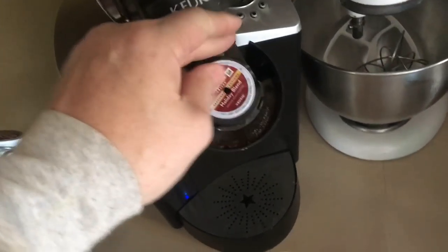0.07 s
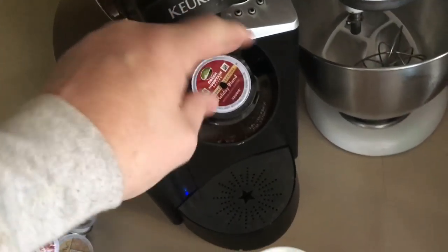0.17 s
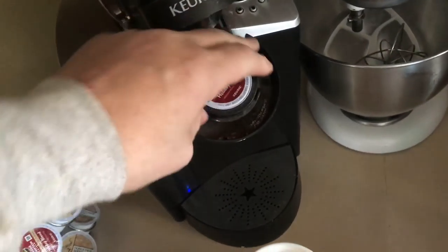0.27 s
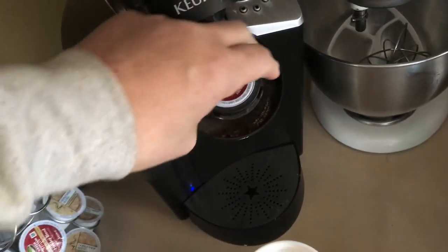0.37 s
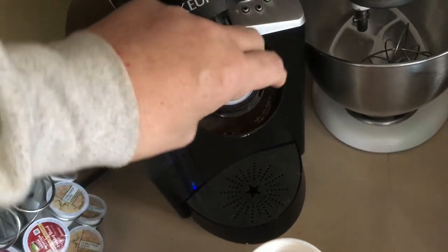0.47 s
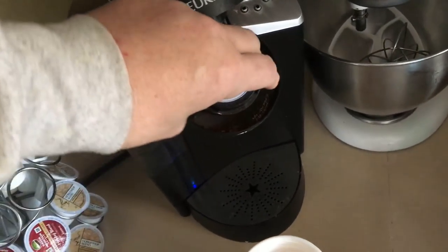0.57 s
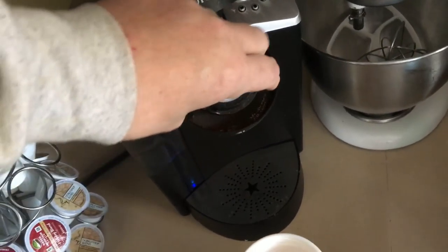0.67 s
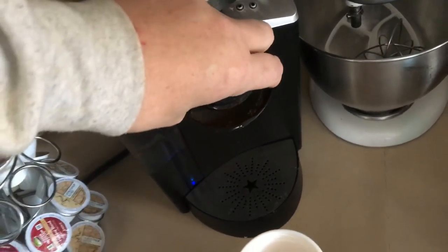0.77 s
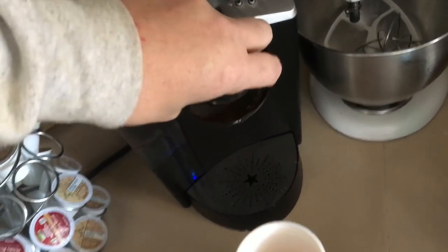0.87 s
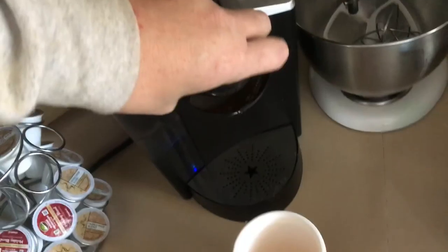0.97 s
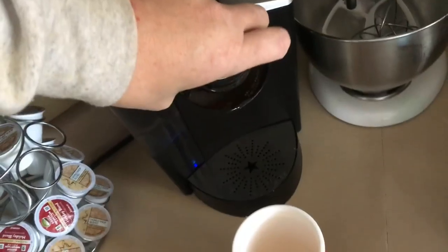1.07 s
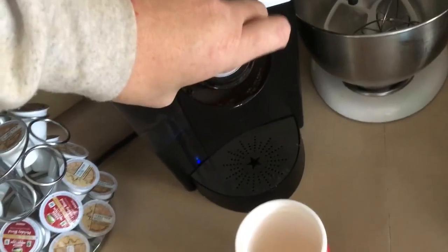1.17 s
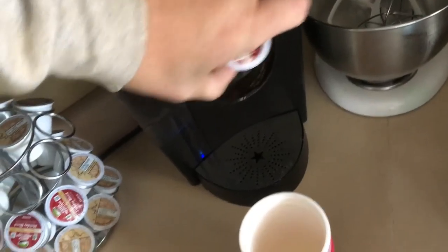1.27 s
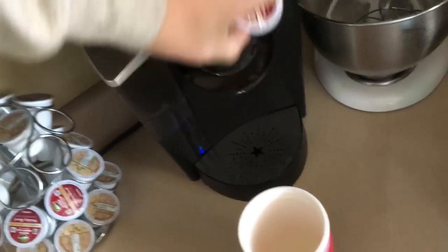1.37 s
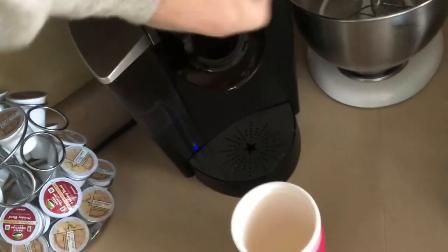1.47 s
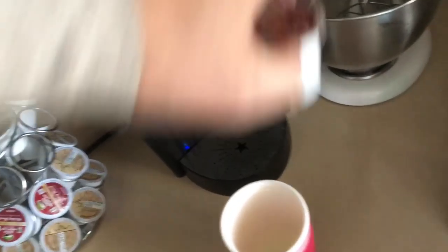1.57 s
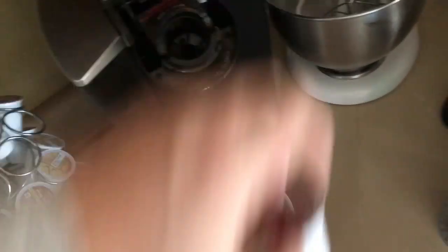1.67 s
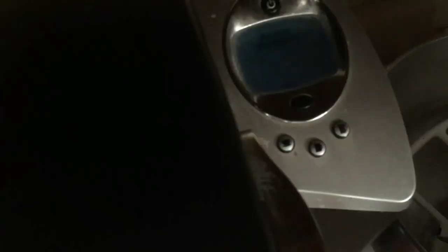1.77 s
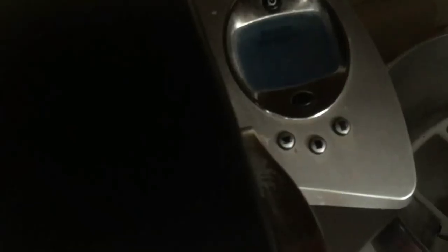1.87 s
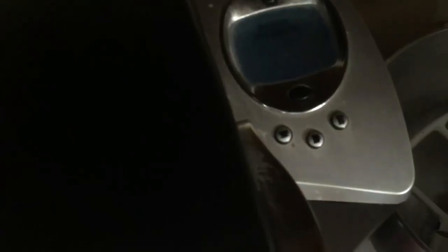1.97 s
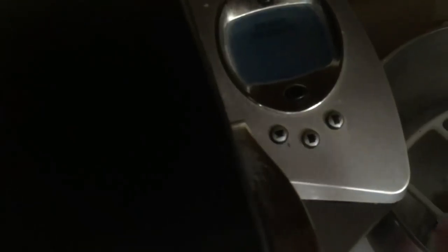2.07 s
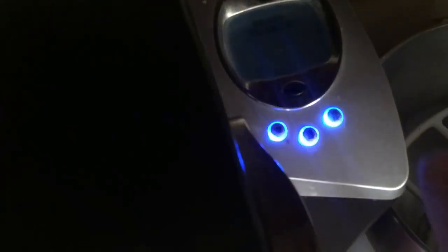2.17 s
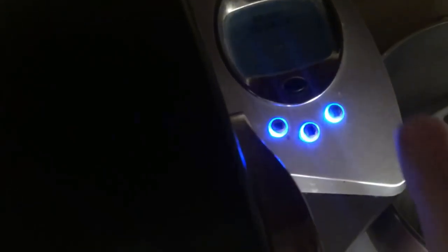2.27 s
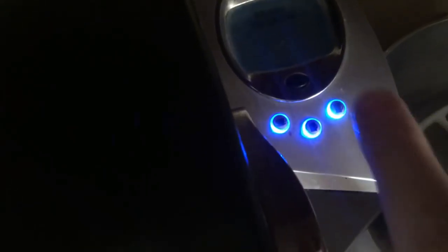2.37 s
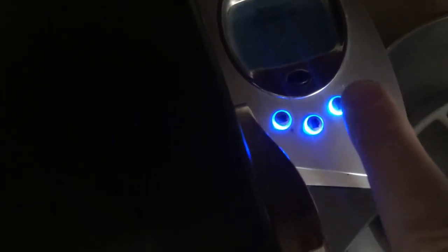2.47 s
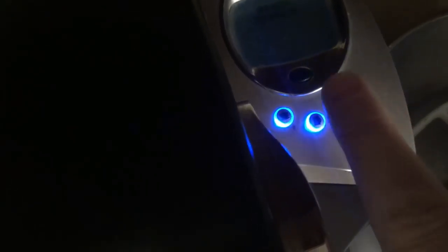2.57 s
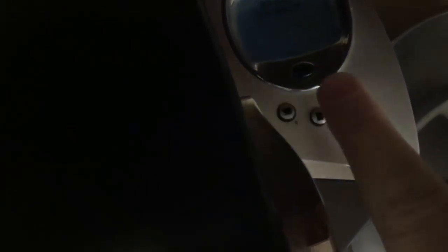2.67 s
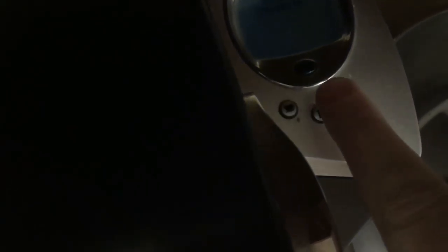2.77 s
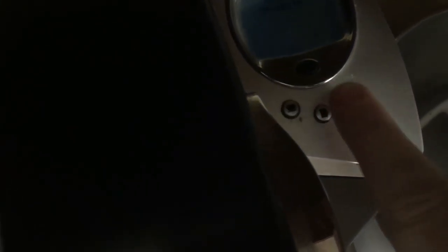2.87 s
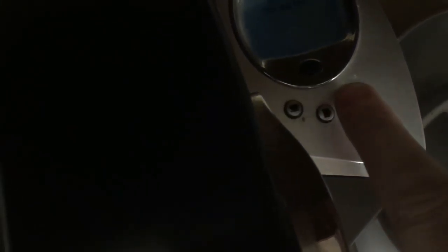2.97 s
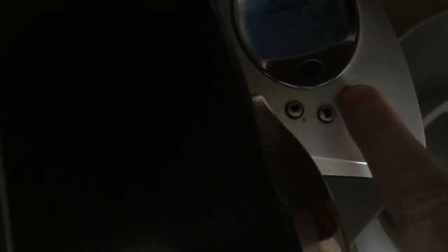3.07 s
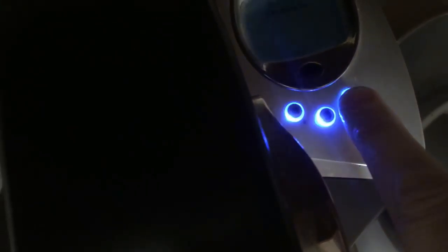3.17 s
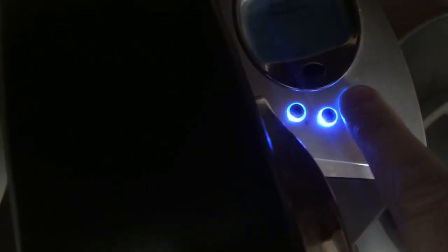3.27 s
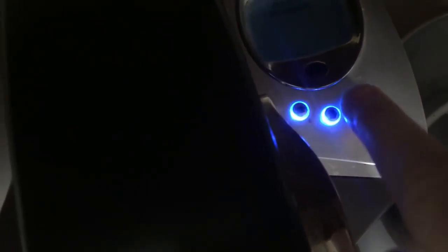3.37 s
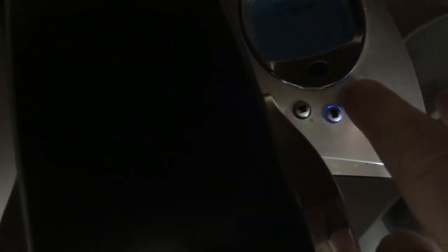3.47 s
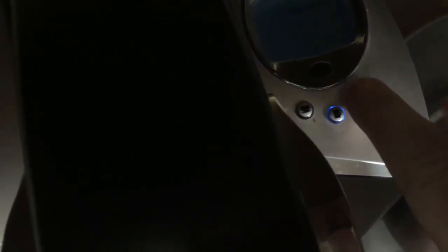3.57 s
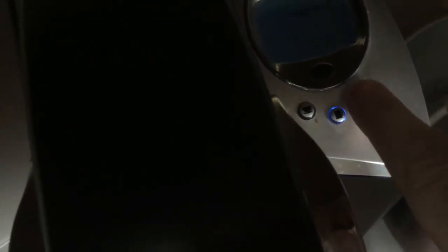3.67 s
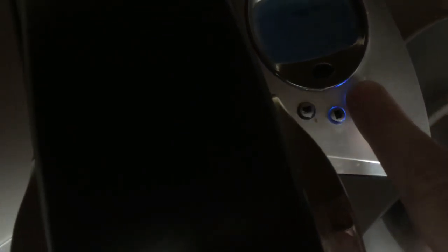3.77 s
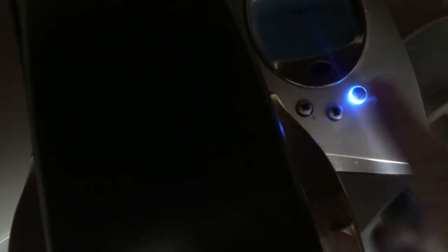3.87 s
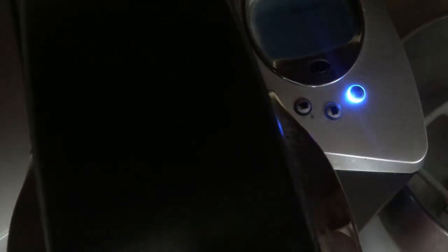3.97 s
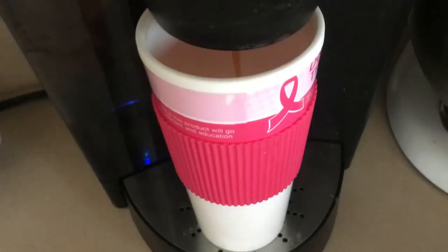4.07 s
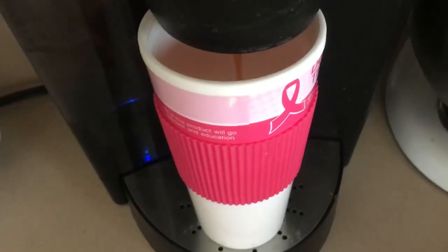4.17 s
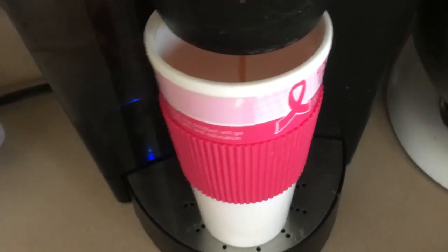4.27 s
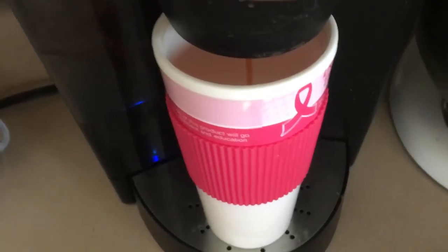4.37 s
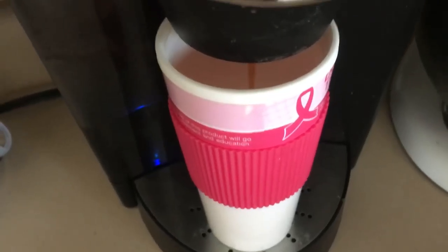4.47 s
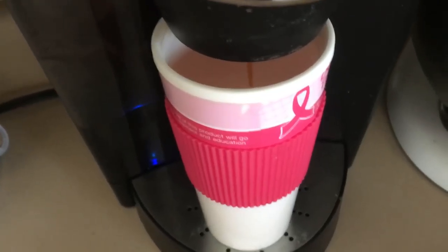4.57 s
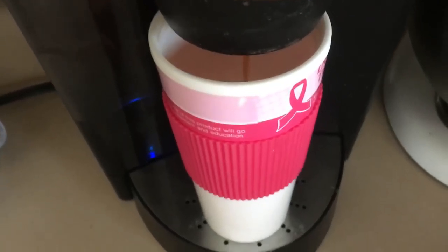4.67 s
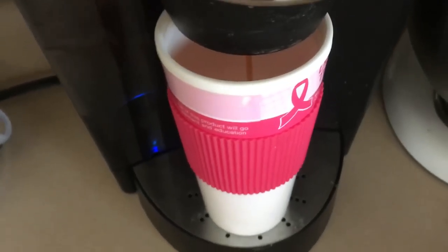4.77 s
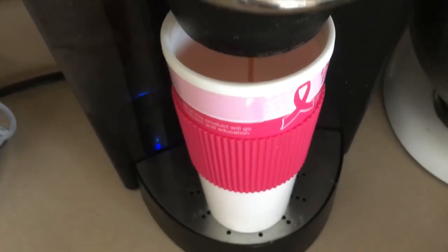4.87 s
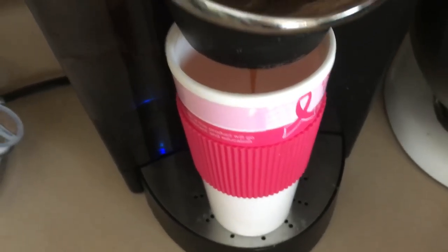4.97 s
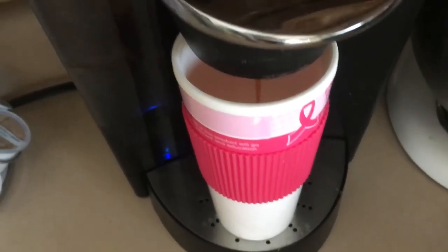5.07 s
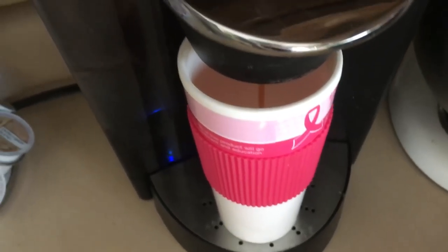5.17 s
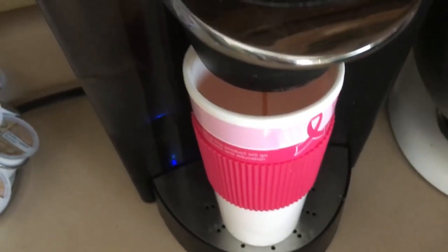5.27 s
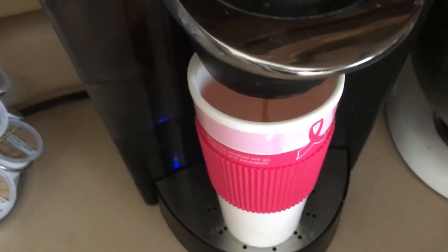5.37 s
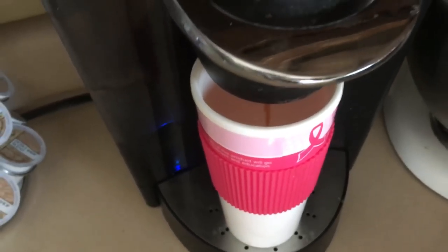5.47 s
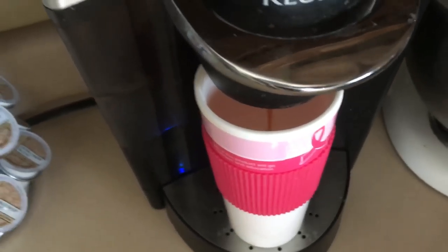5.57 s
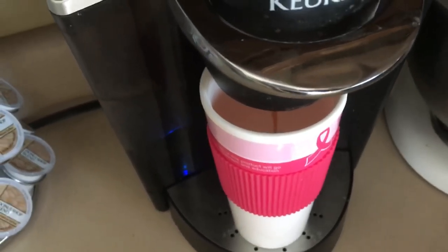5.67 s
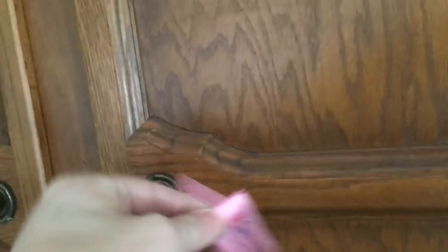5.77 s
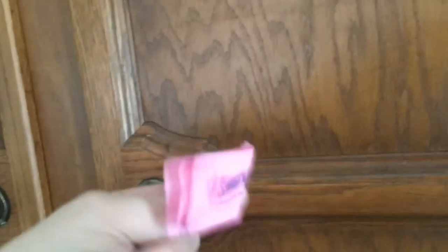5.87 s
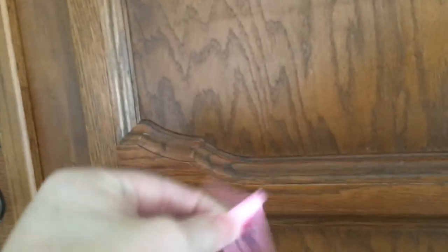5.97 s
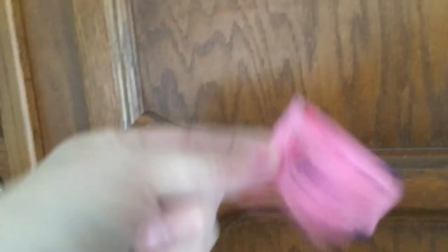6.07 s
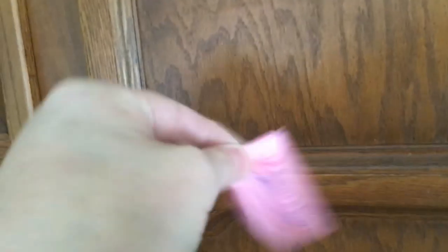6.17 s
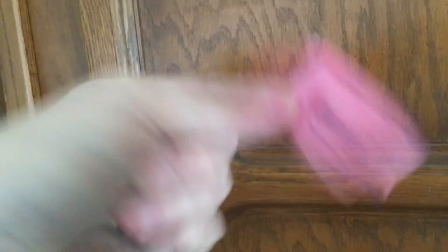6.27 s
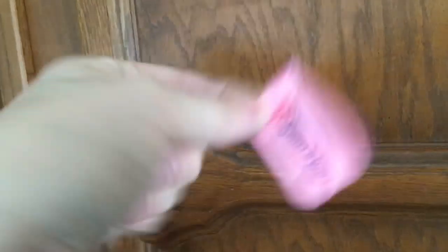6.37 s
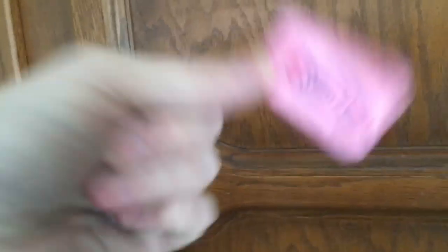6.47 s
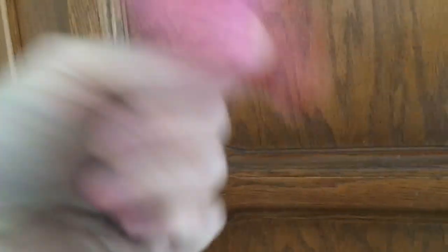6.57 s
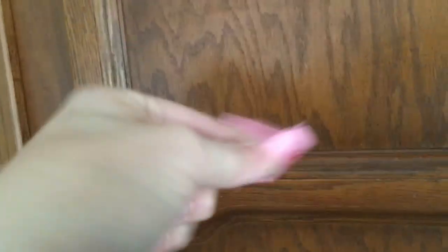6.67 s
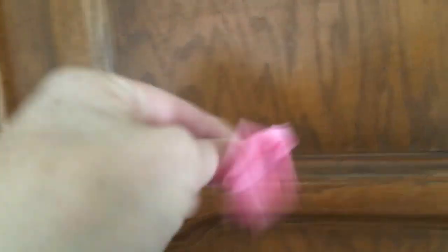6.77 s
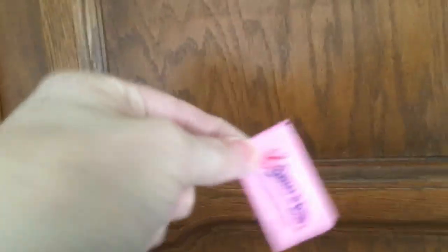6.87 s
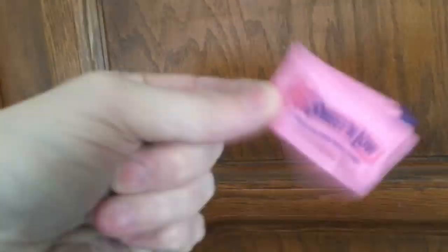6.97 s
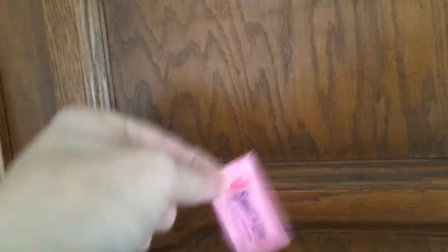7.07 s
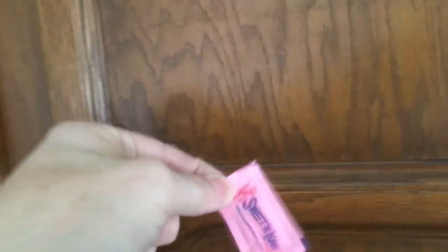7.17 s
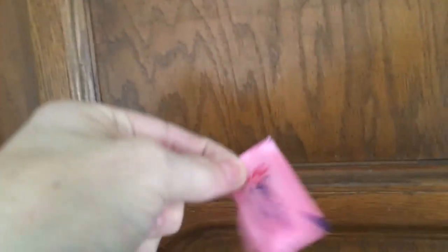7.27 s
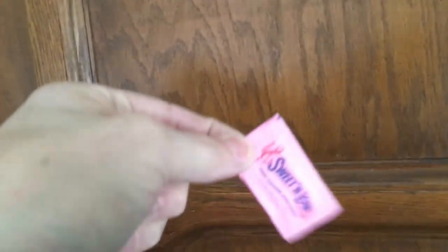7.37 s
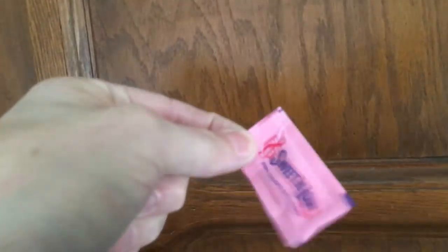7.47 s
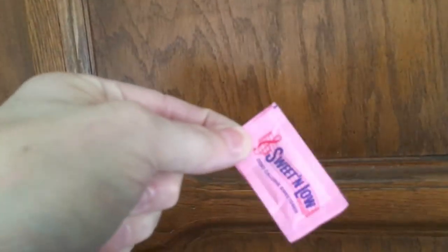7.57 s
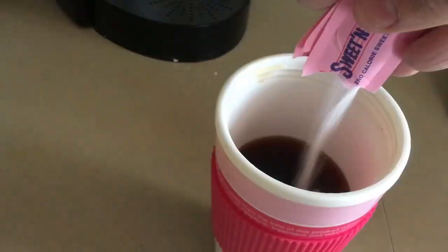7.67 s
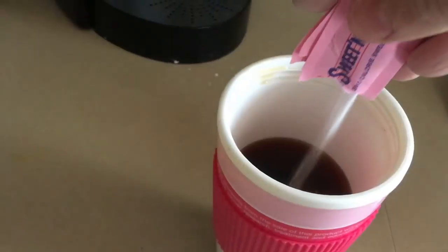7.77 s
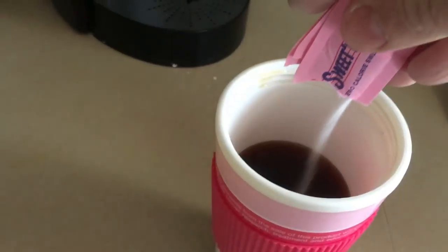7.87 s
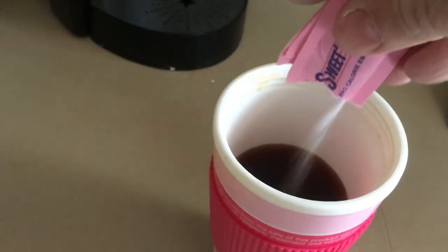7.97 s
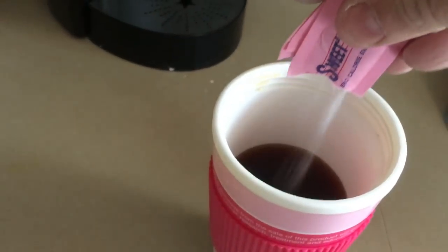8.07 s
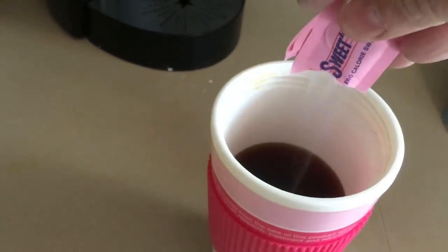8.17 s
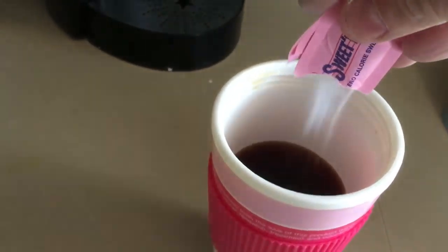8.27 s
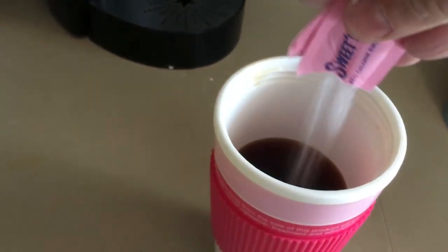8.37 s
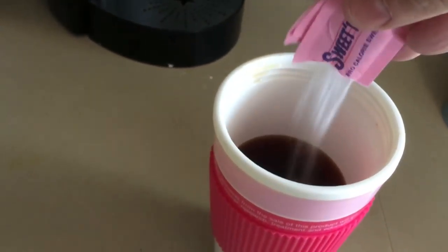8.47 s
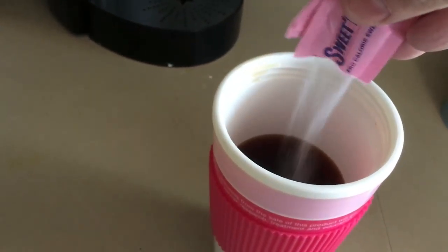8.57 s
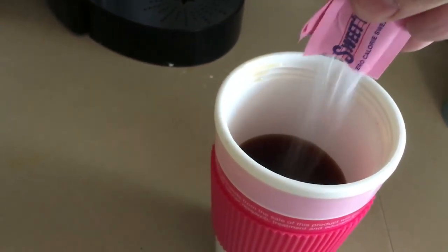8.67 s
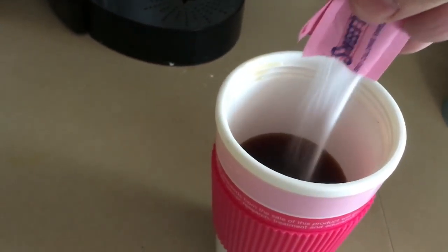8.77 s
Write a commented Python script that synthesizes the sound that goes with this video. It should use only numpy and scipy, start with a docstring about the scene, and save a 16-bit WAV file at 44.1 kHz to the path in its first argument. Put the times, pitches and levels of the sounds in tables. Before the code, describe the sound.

Hands rub and knock on plastic as a pod is pressed into a coffee brewer, and the lid snaps shut. After a quiet stretch with a metallic tap and button clicks, coffee sputters into a paper cup with a fluttering hiss. Paper sweetener sachets are then shaken in quick, crisp snaps, and a motor drones under a few faint ticks. Everything sounds close, in a small kitchen.

```python
"""Hands rub and knock on plastic as a pod is pressed into a coffee brewer, and the lid snaps shut.
Four more kitchen moments follow: a button is pressed; coffee sputters into a paper cup, its flow
fluttering and exciting the cup's resonances; paper sachets of sweetener are shaken, their snaps jolting
the powder; sparse faint ticks sound while a motor drones nearby. Impacts ring in damped modes and
reverberate in a small hard room. Twice the sound drops out for an instant."""
import sys
import numpy as np
from scipy import signal
from scipy.fft import rfft, irfft, next_fast_len
from scipy.io import wavfile

SR = 44100
rng = np.random.default_rng(int(sys.argv[2]) if len(sys.argv) > 2 else 0)


def put_to_file(sound):
    """Save the sound as 16-bit audio at rate SR, in the file named by the first command-line argument."""
    columns = np.atleast_2d(sound).T  # one column per channel
    safe = np.clip(columns, -1, 1)
    whole_steps = np.round(safe * 32767)
    wavfile.write(sys.argv[1], SR, whole_steps.astype(np.int16))


N = 389403
T = np.arange(N) / SR

# Bounds of the five moments in seconds: pod, button, brewing, shaking, motor.
MOMENTS_S = [0, 1.795, 4.077, 5.756, 7.675, 9]
# Room noise, one spectrum per moment. Each point: frequency in Hz, relative density in dB.
AIR_SPECTRA = [
    [(18, -29), (30, 8), (204, 1), (280, -6), (384, -15), (526, -17), (721, -14.5), (16000, -34)],
    [(18, -42), (30, 6.5), (70, 1.5), (165, -16.5), (632, -21), (866, -24.5), (1220, -25), (5040, -35),
     (12000, -38.5), (16000, -37)],
    [(20, -36), (40, 2), (100, -11), (200, -19), (700, -7), (1700, -9), (2700, -13.5), (7000, -21.5),
     (16000, -32)],
    [(20, -37), (40, -10), (80, -5.5), (170, -15), (450, -26.5), (1500, -21.5), (5000, -30), (11000, -28),
     (16000, -35)],
    [(20, -35), (40, -4.5), (110, -5.5), (175, -13), (330, -8.5), (650, -10), (1000, -15), (1300, -18.5),
     (2800, -24.5), (3900, -29), (4500, -31.5), (12500, -33.5), (16000, -44)],
]
# Level of the room noise in dB, one per moment.
AIR_LEVELS_DB = [-60.5, -60, -50, -53.5, -45]
# Hums, one list for each of the last three moments. Each row: frequency in Hz, width in Hz, level in dB.
HUMS = [
    [(98.7, 15, -52.5)],
    [(55.44, 12.4, -52), (222.3, 17.1, -60), (290.7, 26.8, -65.5)],
    [(55.8, 2.5, -47), (101.4, 5.74, -46.5), (226, 9.3, -51), (288.8, 20, -44.5), (345.3, 11.9, -44),
     (440, 7.2, -54), (494, 13.16, -51), (590, 8.5, -56), (709, 29.96, -48), (810, 11.2, -56.5),
     (953, 29.8, -55), (3900, 100, -68.5)],
]
# Hands grip the housing. Each row: strongest instant in seconds, rumble in dB, rustle in dB,
# then the rise and the rumble's fade in seconds per 60 dB.
RUBS = [(.06, -40.5, -47, 1.1, 0.41), (0.203, -28, -31.5, 0.21, 0.42), (.55, -60.5, -65.5, 0.14, 3),
        (.74, -52.5, -58, 0.65, 0.92), (1.06, -62, -60.5, 1.6, 4.2), (1.341, -35.5, -37, 0.11, 0.42),
        (1.738, -71.5, -67.5, 0.74, 1), (3.4, -50, -67.5, 0.14, 0.61), (3.59, -56, -70, 0.64, .35),
        (3.85, -58.5, -87.5, 0.32, 0.51),]
# Spectrum of skin sliding on plastic. Each row: frequency in Hz, relative density in dB.
RUSTLE_SPECTRUM = [(410, -38.5), (700, -6), (863, -7.5), (997, -12), (1460, -13), (5400, -24), (16000, -34)]
# Resonances of the plastic shells. Each row: frequency in Hz, width in Hz, level in dB.
SHELL_MODES = [(594, 65, -2), (846, 91, 2.5), (1737, 230, -5.5), (2120, 47, -9.5), (2740, 52, -8.5),
               (3410, 140, -13), (3940, 55, -12.5), (4440, 160, -12), (5740, 120, -16.5), (6570, 110, -19)]
# What is knocked: pod, housing, button, the lid's rim, a fingertip on the panel. Each holds: ring in Hz,
# rattle t60 in seconds, relative thud in dB, weight of broad clatter, top of the crack in Hz.
POD = (2048.5, 0.12, -26, 2.5, 10999)
HOUSING = (902, 0.12, -11, 3, 11002)
BUTTON = (1203, 0.07, -0.5, 2.5, 17000.5)
RIM = (3400, .1, -22, .8, 12000)
FINGER = (400, 0.1, 1, 0.17, 15000)
# Knocks on the brewer. Each row: start in seconds, level in dB, relative crack in dB, part struck.
KNOCKS = [(.048, -33, -9, POD), (.06, -40, -25, HOUSING), (.133, -25, -16.5, POD), (0.139, -19, 1, POD),
          (0.167, -21.5, -7.5, POD), (.194, -16, -4, POD), (.203, -10.5, -6, HOUSING),
          (.208, -19.5, -4.5, POD), (.29, -32.5, -7, POD), (.454, -21, -27, POD), (0.518, -37, -14, POD),
          (.538, -41, -9, POD), (.63, -26, -4, POD), (.68, -40.5, -20, POD), (0.73, -35.5, -9, POD),
          (.927, -40.5, -25, POD), (.94, -44, -25, POD), (0.976, -34.5, -1.5, POD),
          (1.057, -37.5, -27, HOUSING), (1.272, -55.5, 10, RIM), (1.333, -26, -0.5, RIM),
          (1.345, -32.5, -1.5, RIM), (1.408, -33.5, -9, RIM), (3.376, -27.5, 1, BUTTON),
          (3.4072, -33, -11, BUTTON), (3.439, -49, -25, FINGER), (3.545, -44, -12, FINGER),
          (3.591, -45.5, -8.5, FINGER), (3.827, -58, -26.5, FINGER), (3.916, -46, -14, BUTTON),
          (3.928, -39.5, -16, POD)]
# Gaps in the sound. Each row: start, onset of silence and end in seconds, gain in dB before the silence.
DROPOUTS = [(0.476, 0.498, .516, -21), (6.916, 6.927, 6.956, -23)]
# Taps on a small metal part. Each row: start in seconds, level in dB.
METAL_TAPS = [(.975, -34), (2.643, -20)]
# Modes of the metal part and of the lid. Each row: frequency in Hz, level in dB, t60 in seconds.
METAL_MODES = [(380, -15, .06), (620, -10, .06), (1254, -9, .05), (1626, -9, .08), (2083, -7, .045),
               (3187, -2, .04), (3750, -6, .035), (4620, -4, .055), (4753, -8, .09), (5879, -7, .045),
               (6831, -11, .075), (8231, -10, .085), (9905, -12, .04), (10810, -9, .07), (14090, -5, .065),
               (15150, -9, .04)]
LID_MODES = [(880, -14, .05), (1000, -4, .09), (1061, -1, .08), (1180, -2, .07), (1287, 0, .075),
             (1400, -4, .06), (2050, -6, .03), (2450, -6, .03), (2830, -2, .035), (4200, -15, .05),
             (6175, -18, .035)]
# Air and coffee in the outlet. Each row: time in seconds, resting pitch in Hz, flutter in dB, rush in dB.
FLOW = [(4.077, 395, -46, -35.5), (4.159, 389, -46, -39), (4.3, 386.8, -46.5, -37.5),
        (4.44, 382, -46.5, -35), (4.481, 365.8, -44, -37.5), (4.631, 356.4, -46, -36),
        (4.8, 389.4, -48.5, -36), (5.0, 391.3, -47.5, -38.5), (5.101, 361.4, -46, -40.5),
        (5.2, 354.2, -44.5, -36), (5.4, 357.3, -47, -34), (5.65, 357.8, -50.5, -36),
        (5.756, 368.6, -49.5, -38)]
# The flutter hops up and falls back. Each row: centre in seconds, rise in Hz, half length in seconds.
HOPS = [(4.086, 79.5, .015), (4.133, 65.3, .018), (4.185, 70.3, .012), (4.269, 75.7, .015),
        (4.676, 104.4, .022), (4.769, 89.2, .022), (4.847, 80.4, .012), (4.911, 80.6, .018),
        (5.122, 61.2, .01), (5.175, 95.6, .022), (5.335, 134.9, .035), (5.468, 104.5, .025),
        (5.541, 89.8, .015), (5.603, 61.2, .02), (5.724, 148, .04)]
# The flow stalls. Each row: centre in seconds, dip of the flutter in dB.
STALLS = [(5.2, -8), (5.236, -15), (5.289, -26), (5.43, -16), (5.569, -26), (5.7, -5)]
# The flutter turns uneven as the flow weakens. Each row: time in seconds, level spread in dB.
RASP = [(5.1, 2), (5.3, 3.8)]
# Harmonics of the flutter, each heard where it meets a resonance.
# Each row: harmonic number, resonance in Hz, half width in Hz, relative level in dB.
OVERTONES = [(2, 719, 64, 4.5), (3, 1170, 110, 11), (5, 1860, 94, -12), (7, 2950, 83, -9.5)]
# Resonances of cup and outlet. Each row: frequency in Hz, width in Hz, level in dB.
CUP_MODES = [(1045, 24, -4), (1157, 18, -3), (1240, 35, -9), (1345, 30, -14), (1460, 35, -16),
             (880, 45, -19), (2080, 60, -18), (2280, 30, -21), (2590, 65, -13), (3370, 40, -25),
             (3740, 90, -21), (4680, 200, -23), (5750, 350, -24), (4130, 60, -26), (2830, 90, -20),
             (480, 90, -15), (715, 60, -12)]
# Bursting drops; snaps of shaken paper; the sachet's last sharp snaps, then sparse faint ticks.
# Each row: time in seconds, peak in dB, resonance in Hz.
SPLASHES = [(4.1043, -35.5, 4820), (4.152, -29, 4730), (4.19, -38, 6800), (4.3028, -28, 4470),
            (4.3202, -28.5, 8750), (4.408, -33, 6160), (4.4869, -33, 5880), (4.5327, -25.5, 5400),
            (4.572, -41, 13010), (4.5992, -28, 4970), (4.705, -35, 12940), (4.7391, -32, 3948),
            (4.8528, -24, 5336), (4.868, -31, 5000), (4.891, -28.5, 5560), (4.9549, -29.5, 13340),
            (4.986, -20.5, 5080), (5.0506, -27, 4130), (5.084, -38, 13700), (5.1486, -27.5, 8120),
            (5.2063, -30.5, 5640), (5.2919, -35.5, 8600), (5.3207, -43, 8840), (5.3709, -28.5, 4700),
            (5.3928, -27, 5800), (5.4646, -31.5, 3960), (5.5627, -23, 4020), (5.6112, -32, 5740),
            (5.6408, -29, 8370), (5.6903, -19.5, 5450), (5.7373, -28.5, 3714)]
PAPER_SNAPS = [(5.791, -31, 3960), (5.805, -19.5, 4500), (5.815, -17, 6230), (5.844, -22, 11100),
               (5.853, -8, 5300), (5.864, -20, 3980), (5.9157, -11, 6170), (5.927, -18, 8000),
               (6.057, -19, 7000), (6.107, -18, 6000), (6.063, -9, 7200), (6.0968, -5, 4000),
               (6.1598, -14, 4100), (6.166, -7.5, 6800), (6.1813, -7.5, 6700), (6.1944, -16, 8000),
               (6.215, -6.5, 6300), (6.2376, -15, 6000), (6.258, -14, 10000), (6.279, -8.5, 9650),
               (6.306, -5.5, 3820), (6.3474, -27, 3400), (6.358, -8, 7100), (6.3694, -8.5, 3200),
               (6.377, -11.5, 7000), (6.4066, -11.5, 3300), (6.4272, -16, 7000), (6.4477, -16.5, 8950),
               (6.463, -24, 9300), (6.486, -14, 3900), (6.4935, -14.5, 8000), (6.5185, -14, 4300),
               (6.528, -5, 3870), (6.578, -11, 6600), (6.5886, -4.5, 6600), (6.5993, -15, 8800),
               (6.616, -20, 6200), (6.6252, -4, 6270), (6.654, -20, 5000), (6.66, -14.5, 6740),
               (6.707, -20, 8800), (6.727, -21, 11000), (6.737, -16.5, 6400), (6.762, -14, 5000),
               (6.7722, -4, 4500), (6.816, -19, 5000), (6.819, -18, 1990), (6.824, -18, 9000),
               (6.833, -15, 7000), (6.845, -5, 6450), (6.8504, -5, 6960), (6.859, -2.5, 3620),
               (6.914, -12.5, 4300), (6.9953, -12.5, 3360), (7.0094, -17.5, 5900), (7.019, -19, 3680),
               (7.035, -16.5, 6270), (7.0497, -22.5, 2280), (7.079, -16.5, 9000), (7.0834, -14, 5400),
               (7.092, -22, 7000), (7.0993, -2, 7600), (7.107, -19, 9000), (7.12, -5.5, 2120),
               (7.128, -13.5, 5800), (7.163, -23, 3900), (7.1758, -9.5, 5860), (7.1836, -12, 6500),
               (7.205, -20, 4550), (7.211, -5.5, 2860), (7.274, -13, 4140), (7.2998, -7.5, 5760),
               (7.4159, -19, 4760), (7.4284, -12.5, 6040), (7.4426, -19.5, 2620)]
LAST_SNAPS = [(7.486, -36, 4440), (7.5218, -11, 8000), (7.5466, -34, 4040), (7.57, -16, 6000),
              (7.6651, -24, 4270), (7.724, -38, 7500), (7.7887, -39, 8000), (7.8827, -37, 3840),
              (8.062, -36, 10000), (8.087, -39, 9000), (8.6568, -32, 11200), (8.7196, -36, 7500),
              (8.7331, -27.5, 6130)]
# Spectrum of powder sliding in paper. Each row: frequency in Hz, relative density in dB.
POWDER_SPECTRUM = [(240, -19), (400, -80), (588, -16), (789, -13.5), (3750, -8), (9040, -13.5),
                   (16000, -24)]
# The sachets flap softly. Each row: start in seconds, peak in dB.
FLAPS = [(5.907, -37.5), (6.094, -31), (6.24, -25.5), (6.302, -31), (6.623, -36), (6.766, -36)]
# Treble resonances of the motor's brushes. Each row: frequency in Hz, width in Hz, level in dB.
BRUSH_MODES = [(11050, 200, -84), (14600, 500, -64.5), (15240, 200, -66)]

BREW_START_S, BREW_END_S, SHAKING_END_S = MOMENTS_S[2], MOMENTS_S[3], 7.4


def amp(db):
    """Amplitude ratio of a level in dB."""
    return 10 ** (np.asarray(db) / 20)


def unit(x):
    """Normalisation to rms 1."""
    return x / np.sqrt(np.mean(x ** 2) + 1e-20)


def peak(x):
    """Normalisation to peak 1."""
    return x / np.abs(x).max()


def add(out, s, piece):
    """Superposition of a piece from second s."""
    at = round(s * SR)
    out[at:at + len(piece)] += piece[:N - at]


def noise():
    """White Gaussian noise."""
    return rng.standard_normal(N)


def drift(rate_hz):
    """Slow random modulation: low-passed noise of rms 1."""
    r = np.exp(-2 * np.pi * rate_hz / SR)
    return unit(signal.lfilter([1], [1, -2 * r, r * r], noise()))


def burst(t60, size):
    """Noise with a sudden onset and exponential decay."""
    return rng.standard_normal(size) * amp(-60 * np.arange(size) / SR / max(t60, .002))


def grains(per_s, spread_db):
    """Shot noise: random impulses of uneven size."""
    sizes = amp(spread_db * np.minimum(rng.exponential(1, N), 5)) * rng.choice([-1, 1], N)
    return sizes * (rng.random(N) < per_s / SR)


def swell(s, db, rise, fade):
    """Exponential growth up to second s and decay after it, both in seconds per 60 dB."""
    distance = np.where(T < s, (s - T) / max(rise, .01), (T - s) / max(fade, .01))
    return amp(db - 60 * np.clip(distance, 0, 4))


def bump(s, half_s):
    """A blunt bell curve of height 1 around second s."""
    return np.exp(-np.abs((T - s) / half_s) ** 3.08)


def coloured(x, points):
    """Spectral shaping by (Hz, dB) points, to rms 1."""
    size, (hz, db) = next_fast_len(N), np.transpose(points)
    shape_db = np.interp(np.log(np.arange(size // 2 + 1) * SR / size + 1), np.log(hz), db)
    return unit(irfft(rfft(x, size) * amp(shape_db), size)[:N])


def band(x, low_hz, high_hz, order=2):
    """Band-pass filtering."""
    sos = signal.butter(order, [low_hz, min(high_hz, .45 * SR)], "band", fs=SR, output="sos")
    return signal.sosfilt(sos, x)


def resonance(x, hz, width):
    """Forced response of a resonator with peak gain 1."""
    r, w = np.exp(-np.pi * width / SR), 2 * np.pi * hz / SR
    return signal.lfilter([(1 - r * r) / 2, 0, (r * r - 1) / 2], [1, -2 * r * np.cos(w), r * r], x)


def ring(x, hz, t60):
    """Free vibration: a unit impulse starts a damped sine of height 1."""
    r, w = amp(-60 / (t60 * SR)), 2 * np.pi * hz / SR
    return signal.lfilter([0, np.sin(w)], [1, -2 * r * np.cos(w), r * r], x)


def background():
    """Broadband room noise, different in each moment, with hums and at last the motor superposed."""
    layers = [amp(db) * coloured(noise(), air) for air, db in zip(AIR_SPECTRA, AIR_LEVELS_DB)]
    layers[2] *= amp(4.5 * drift(32))   # the hiss of the brew comes in patches
    layers[4] *= amp(1.2 * drift(35))
    for moment, hums in enumerate(HUMS, start=2):
        layers[moment] += sum(amp(db) * hum(hz, width) for hz, width, db in hums)
    layers[4] += motor_brushes()
    return sum(x * (T >= start) * (T < end) for x, start, end in zip(layers, MOMENTS_S, MOMENTS_S[1:]))


def shells(x, spread_db):
    """Modal response of the plastic shells, each mode excited with a random strength."""
    return sum((-1) ** k * amp(db + spread_db * rng.normal()) * unit(resonance(x, hz, width))
               for k, (hz, width, db) in enumerate(SHELL_MODES))


def hands():
    """Friction of fingers on plastic gives a dull rumble and a grainy rustle that dies sooner."""
    rumble = band(noise(), 33, 230) + 1.9 * resonance(noise(), 220, 43)
    rumble = unit(rumble + .44 * resonance(noise(), 300, 110)) * amp(1.4 * drift(27))
    rustle = coloured(noise() + .38 * unit(grains(1400, 2.9)), RUSTLE_SPECTRUM)
    rustle = unit(rustle + .51 * unit(shells(rustle + .27 * noise(), spread_db=.5)))
    out = sum(swell(s, rumble_db, rise, fade) * rumble + swell(s, rustle_db, rise, .61 * fade) * rustle
              for s, rumble_db, rustle_db, rise, fade in RUBS)
    touching = ((T < MOMENTS_S[1]) | (T > MOMENTS_S[1] + 1)) & (T < BREW_START_S)
    return out * touching


def knocks():
    """Impact excitation: a short rattle rings the part struck, with a thud below and a crack above."""
    out, size = np.zeros(N), SR // 3
    for s, db, crack_db, (ring_hz, t60, thud_db, clatter, top_hz) in KNOCKS:
        rattle = burst(t60, size)
        hz = ring_hz * (1 + .12 * rng.uniform(-1, 1))   # each knock lands elsewhere
        body = peak(resonance(resonance(rattle, hz, .13 * hz), hz, .5 * hz))
        body += clatter * peak(band(rattle, 650, 3000, order=3))
        body = peak(body + .86 * clatter * peak(shells(rattle, spread_db=6.5)))
        thud = peak(band(burst(2.1 * t60, size), 140, 700))
        crack = peak(band(burst(.32 * t60, size), 3000, top_hz))
        add(out, s, amp(db) * (body + amp(thud_db) * thud + amp(crack_db) * crack))
    return out


def rocking(start_s=.755, db=-29):
    """A shove rocks the brewer on the counter as a low damped oscillator."""
    out, shove = np.zeros(N), np.pad(np.hanning(300), (0, SR // 3))
    add(out, start_s, amp(db) * peak(ring(shove, hz=67, t60=.2)))
    return out


def struck(s, db, modes, blows, clatter, low_hz):
    """Quick contacts (delay in seconds, strength) excite damped modes and a broadband clatter."""
    out, contact = np.zeros(N), np.full(SR // 2, 1e-18)
    for delay_s, strength in blows:
        contact[round(delay_s * SR)] = strength
    rings = sum((-1) ** k * amp(mode_db) * ring(contact, hz, t60)
                for k, (hz, mode_db, t60) in enumerate(modes))
    rattle = band(burst(.087, SR // 2), low_hz, 12000)
    add(out, s, amp(db) * (peak(rings) + clatter * peak(rattle)))
    return out


def metal_taps():
    """A double contact rings the inharmonic modes of a small metal part."""
    return sum(struck(s, db, METAL_MODES, blows=[(.0005, .6), (.0027, 1)], clatter=.3, low_hz=477)
               for s, db in METAL_TAPS)


def lid(start_s=1.312):
    """Three contacts ring the closing lid; cavity resonance of the air in the housing outlasts it."""
    blows = [(0, .49), (.002, .53), (.007, .45)]
    out = struck(start_s, db=-6, modes=LID_MODES, blows=blows, clatter=.062, low_hz=1210)
    cavity = band(burst(t60=.55, size=SR // 2), 950, 1350)
    add(out, start_s, amp(-27) * peak(cavity))
    return out


def outlet_flutter(pitch_hz):
    """Flow-driven oscillation: each harmonic swells as the pitch carries it through a resonance."""
    phase = 2 * np.pi * np.cumsum(pitch_hz) / SR
    rasp_db = np.interp(T, *np.transpose(RASP))
    flutter = amp(rasp_db * drift(90)) * np.sin(phase)
    for k, hz, half_width, db in OVERTONES:
        detuning = (k * pitch_hz - hz) / half_width
        flutter += amp(db + rasp_db * drift(36)) * np.sin(k * phase) / (1 + detuning ** 2)
    return np.sqrt(2) * flutter


def cup_rush(bubbles, patchy_db=2.5, sink_db_per_s=-3.5):
    """Bubbles force the cup's resonances; those above 2 kHz weaken as the cup fills."""
    sinking_db = sink_db_per_s * (T - (BREW_START_S + BREW_END_S) / 2)
    rush = np.zeros(N)
    for k, (hz, width, db) in enumerate(CUP_MODES):
        gain = amp(db + patchy_db * drift(25) + (hz > 2000) * sinking_db)
        rush += (-1) ** k * gain * unit(resonance(resonance(bubbles, hz, width), hz, 3 * width))
    return unit(rush)


def brewing():
    """Unsteady flow of air and coffee modulates a flutter and a bubbly rush, ending in a swish."""
    times, *columns = np.transpose(FLOW)
    rest_hz, flutter_db, rush_db = [np.interp(T, times, column) for column in columns]
    hop_hz = sum(hz * bump(s, half_s) for s, hz, half_s in HOPS)
    stall_db = sum(db * bump(s, half_s=.017) for s, db in STALLS)
    pitch_hz = (rest_hz + hop_hz) * (1 + .017 * drift(30) + .009 * drift(250))
    flow = amp(flutter_db + stall_db) * outlet_flutter(pitch_hz)
    bubbles = unit(grains(5000, 2.6)) * amp(.84 * drift(39))
    flow += amp(rush_db + .33 * stall_db - hop_hz / 100) * cup_rush(bubbles)   # hops weaken the rush
    lingering = swell(BREW_END_S, db=-8, rise=1, fade=.44)
    return flow * np.where(T < BREW_END_S, T >= BREW_START_S, lingering) + swish(bubbles)


def hum(hz, width):
    """Random modulation makes a tone waver, and narrowband noise blurs it; rms about 1."""
    level = np.sqrt(2) * amp(2 * drift(8.7))
    phase = 2 * np.pi * np.cumsum(hz + .4 * width * drift(8.04)) / SR
    blur = unit(resonance(resonance(noise(), hz, width), hz, 2 * width))
    return .35 * level * np.sin(phase) + .92 * blur


def spray():
    """Tiny droplets burst at random, each a damped oscillation at one of ten pitches."""
    droplets, pitch_index = grains(400, 5.2), rng.integers(0, 10, N)
    rings = sum(ring(droplets * (pitch_index == k) + 1e-18, hz, t60=20 / hz)
                for k, hz in enumerate(np.geomspace(2800, 12000, 10)))
    return amp(-60.5) * unit(rings) * (T > BREW_START_S) * (T < BREW_END_S)


def snaps(rows, low_hz, focus, t60, lead, spike, crumple_db):
    """Transients that build, snap and decay unevenly, each with a resonance over a broad crack."""
    out, ahead, size = np.zeros(N), 300, SR // 10
    for s, db, hz in rows:
        uneven = amp(crumple_db * np.repeat(rng.standard_normal(size // 40 + 1), 40)[:size])
        release = uneven * burst(t60, size) + spike * burst(.0036, size)
        build_up = lead * amp(.93 * db) * burst(.029, ahead)[::-1]
        crackle = np.concatenate([build_up, release])
        crack = peak(band(crackle, low_hz, 15400, order=1))
        colour = peak(resonance(crackle, hz, .26 * hz))
        add(out, s - ahead / SR, amp(db) * peak(crack + focus * colour))
    return out


def splashes():
    """Bursting drops of coffee radiate brief, bright transients."""
    return snaps(SPLASHES, low_hz=8000, focus=1.8, t60=.022, lead=.15, spike=1.2, crumple_db=1.5)


def shaken_paper():
    """Paper buckles in sharp snaps, with a lesser crinkle near each while the shaking lasts."""
    loud = snaps(PAPER_SNAPS, low_hz=1308, focus=.52, t60=.026, lead=.54, spike=2.18, crumple_db=3)
    crinkles = [(s + rng.uniform(-.012, .035), db + rng.uniform(-31, -20), rng.uniform(2000, 13000))
                for s, db, _ in PAPER_SNAPS if s < SHAKING_END_S]
    return loud + snaps(crinkles, low_hz=1310, focus=1.5, t60=.04, lead=2, spike=.3, crumple_db=3)


def powder(relative_db=-32.5, rise_s=.079, fade_s=.18):
    """Granular noise: every snap of the shaking jolts clumps of grains into a slide."""
    sliding = unit(grains(6000, 4.5)) * amp(2.5 * drift(60))
    jolts, since = np.zeros(N), T[:SR] - .5
    jolt = amp(relative_db - 60 * np.where(since < 0, -since / rise_s, since / fade_s))
    for s, db, _ in PAPER_SNAPS:
        if s < SHAKING_END_S:
            add(jolts, s - .5, amp(db) * jolt)
    return jolts * coloured(sliding + .087 * noise(), POWDER_SPECTRUM)


def swish(bubbles):
    """Resonances near 1 kHz filter the bubbling into a brief hollow swish."""
    hollow = resonance(resonance(bubbles, 1050, 100), 970, 290)
    hollow += .5 * resonance(bubbles, 700, 90) + .48 * resonance(bubbles, 890, 92)
    ending = swell(6.03, db=0, rise=np.inf, fade=.25)
    return swell(5.915, db=-36, rise=.08, fade=3) * ending * unit(hollow)


def flaps():
    """Flapping sachets displace air in soft, low puffs."""
    out = np.zeros(N)
    for s, db in FLAPS:
        add(out, s, amp(db) * peak(band(burst(.13, SR // 5), 134, 1130)))
    return out


def last_snaps():
    """Transients of abrupt onset: the sachet's last sharp paper snaps, then sparse faint ticks."""
    return snaps(LAST_SNAPS, low_hz=1800, focus=1.1, t60=.045, lead=.1, spike=2.5, crumple_db=3)


def motor_brushes(ticks_per_s=53.7):
    """Periodic brush contact pulses noise through resonances in the top treble."""
    ticking = (.3 + np.maximum(np.sin(2 * np.pi * ticks_per_s * T), 0) ** 4) * noise()
    return sum(amp(db) * unit(resonance(ticking, hz, width)) for hz, width, db in BRUSH_MODES)


def kitchen(x, t60=.18, delay_s=.0043, db=-22):
    """Reverberation: convolution with the diffuse tail of a small hard room."""
    tail = band(burst(t60, SR // 2), 200, 7000, order=1)
    tail = np.pad(tail / np.sqrt(np.sum(tail ** 2)), (round(delay_s * SR), 0))
    return amp(db) * signal.fftconvolve(x, tail)[:N]


def scene():
    """Superposition of all sources; only the transients reverberate."""
    sharp = splashes() + spray() + shaken_paper() + flaps() + last_snaps()
    sharp += metal_taps() + knocks() + rocking() + lid()
    return (sharp + kitchen(sharp) + hands() + brewing() + powder() + background())[None]


def record(dry):
    """Gating and band limiting: the sound drops out twice and loses its deepest bass and its top."""
    gate = np.ones(N)
    for start, silent, end, db in DROPOUTS:
        gate *= np.where((T < start) | (T >= end), 1, amp(db) * (T < silent))
    gated = signal.sosfilt(signal.butter(3, 36, "high", fs=SR, output="sos"), dry) * gate
    return signal.sosfilt(signal.cheby2(20, 50, 15950, fs=SR, output="sos"), gated)


dry = scene()
out = record(dry)
put_to_file(out)
```